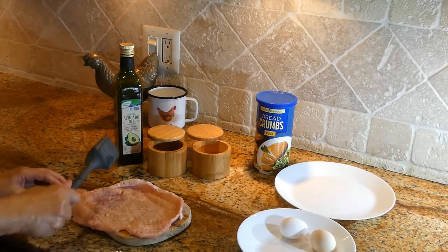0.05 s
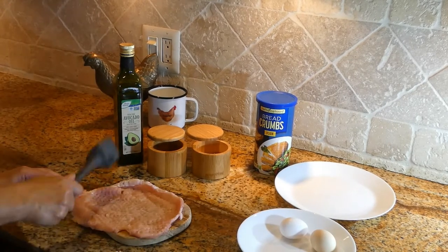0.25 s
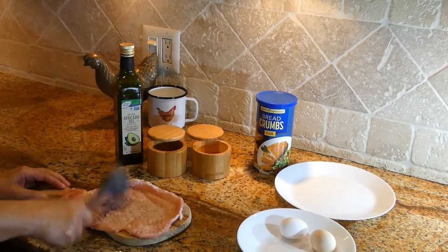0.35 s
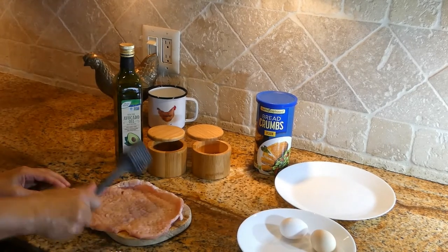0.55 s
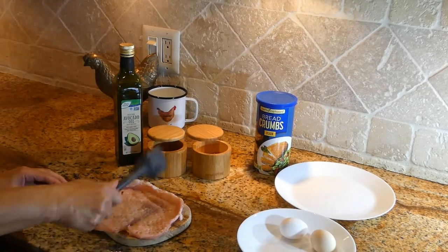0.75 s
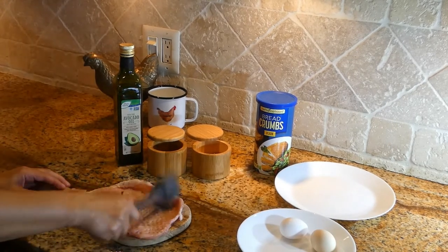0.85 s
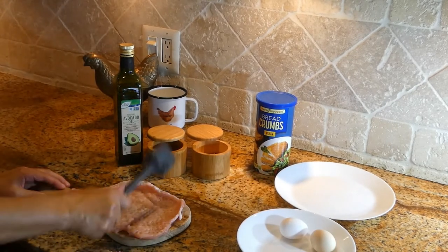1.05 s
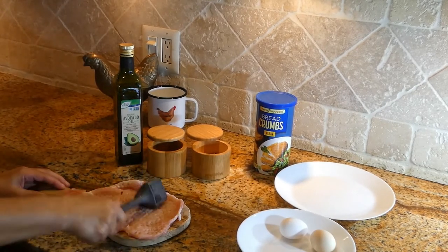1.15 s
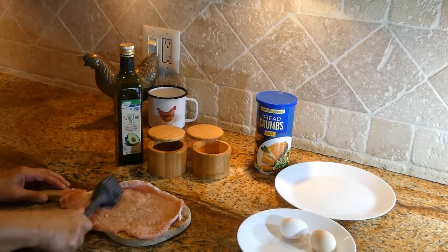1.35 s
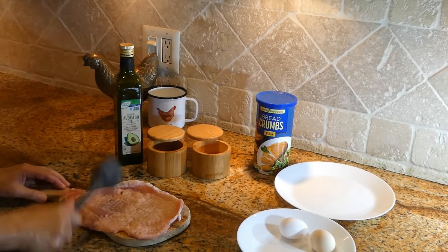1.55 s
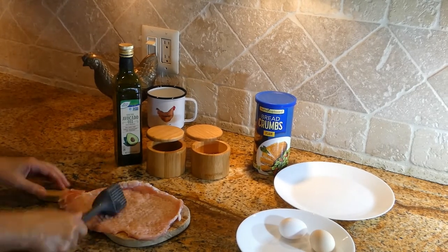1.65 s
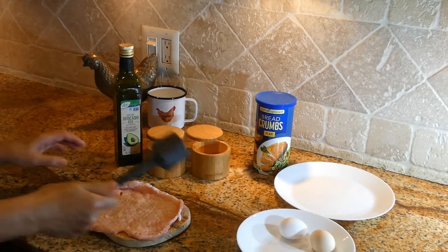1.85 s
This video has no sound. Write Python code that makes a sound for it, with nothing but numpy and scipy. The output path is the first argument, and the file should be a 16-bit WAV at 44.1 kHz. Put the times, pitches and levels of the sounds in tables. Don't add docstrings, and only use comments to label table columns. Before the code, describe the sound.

A mallet pounds raw meat on a wooden board. Silence until 0.2 seconds, then an earlier blow's echo enters abruptly. Six loud wet slaps follow near 0.38, 0.63, 0.88, 1.11, 1.35 and 1.6, each a snappy smack with board knock and varying thud, deepest at 0.88, thinnest at 1.35. Hard tiles, cupboards and counter ring between blows over faint hum; everything fades from 1.7 to 2.0.

```python
import sys
import numpy as np
from scipy import signal
from scipy.fft import rfft, irfft, next_fast_len
from scipy.io import wavfile
from scipy.ndimage import map_coordinates

SR = 44100
rng = np.random.default_rng(int(sys.argv[2]) if len(sys.argv) > 2 else 0)


def generate_wav(signal):
    frames = np.transpose(np.atleast_2d(signal))
    scaled = np.clip(frames, -1, 1) * 32767
    pcm = np.round(scaled).astype(np.int16)
    wavfile.write(sys.argv[1], SR, pcm)


def magnitude_from_level(level_db):
    exponent = np.asarray(level_db, float) / 20
    return 10 ** exponent


N = 83790
ECHO_N = SR
SLAP_N = SR // 4

# start in seconds, level in dB, thud in dB, early walls in dB, room in dB.
BLOWS = [
    (.135, -11.5, 0.5, 8, 0.),
    (0.3789, -12.5, -2, -1, -1.5),
    (0.6251, -13.5, 1.5, 2, -0.26),
    (0.8775, -14, 4, -1, 0.5),
    (1.1110, -12, 3.4, 3, 0.5),
    (1.3491, -13.5, -11, 0, -1),
    (1.5965, -12.5, 0.3, 3, 3.5),
]
# knock, board, slap, head and spray, all in dB.
LANDINGS = [(-6.5, 3, -1.5, -5.5, -30), (-2, 4, 0.5, 0.5, 5), (5, 5, -3, -6.5, -3), (6, 1, -2, 0.5, -1),
            (-2, -0.5, -3.5, -8.5, -4), (-1.5, 4.5, 1, 2.5, 1.5), (-8, 2.5, -5, -4.5, -5.5)]
# start pitch in Hz, sag in seconds, end pitch in Hz,
# cupboard ring in dB, counter boom in dB.
SQUEAKS = [(8050, .0013, 700, 9.5, 0), (6470, 0.00214, 450, 12, -1), (9160, 0.001033, 1150, -7.5, 0.5),
           (6670, 0.00161, 405, -19, 1), (6960, 0.000789, 1274, 4, 1.5), (6895, 0.001113, 830, 11, -1.5),
           (7900, .0009, 566, 6.5, 1)]
# knock in Hz, board in Hz, slap in Hz, knock force in dB, air in the echo in dB.
SPOTS = [(605, 1400, 2600, -23, 1), (695, 1455, 2300, -2, -4), (417, 1490, 2350, 5.5, 10.5),
         (925, 1360, 2450, 1, -2), (454, 1290, 1840, 4, 8.5), (730, 1279, 2290, 4, -4),
         (501.2, 1290, 1880, 1, 5.5)]
# width in Hz, level in dB.
SPOT_PEAKS = [(250, -3), (280, -2), (300, 0.5)]
# frequency in Hz, width in Hz, level in dB.
PARTS = [
    [(116, 64, -13), (155.4, 22.5, -5), (349.7, 41.6, -2.5)],
    [(496.24, 280, -6), (1000, 790, -10.5)],
    [(1060, 400, -9)],
    [(2680, 310, 0)],
    [(4113, 196, 1), (4560, 1580, -4)],
    [(6630, 2100, -4), (10040, 1630, -11), (13900, 1300, -20.5)],
]
# frequency in Hz, width in Hz, level in dB.
CUPBOARD = [(1286, 38, -3), (4140, 110, -31)]
# frequency in Hz, width in Hz, level in dB.
COUNTER = [(228, 18, 3), (160, 19, 4.5), (500, 25, -2)]
# delay in seconds, level in dB, lean in dB (added left, taken off right), favoured pitch
# in Hz.
WALLS = [(.0034, -13, 8, 1480), (.0076, -4.5, 0, 1230), (0.01, -18, 9.5, 1380), (0.0179, -20.5, -5, 1500),
         (.025, -12, 0.5, 2497)]
# frequency in Hz, 60 dB decay time in seconds.
CLUTTER_DECAY = [(150, 0.39), (1500, 0.04), (10000, 0.12)]
# frequency in Hz, 60 dB decay time in seconds.
ROOM_DECAY = [(60, 0.98), (150, 1), (400, 1), (1500, 0.73), (4000, 0.81), (8000, 0.59), (14000, 0.36)]
# frequency in Hz, level in dB.
ECHO_TONE = [(60, -5), (200, 0.), (700, 3), (1300, 3), (2000, 5.5), (5000, -3.5), (9000, -13.5),
             (15000, -19.5)]
# frequency in Hz, left-right likeness from 0 to 1.
LIKENESS = [(60, 0.75), (200, 0.97), (700, .78), (2500, 0.76), (5000, .85), (12000, 0.36)]
# frequency in Hz, left-right difference in dB.
BALANCE = [(60, -0.2), (300, -0.5), (1000, -0.4), (3000, 0.3), (12000, .4)]
# frequency in Hz, level in dB.
AIR_TONE = [(25, -1), (60, -3), (100, 4), (160, -29), (500, -17), (2000, -13), (8000, -40)]

RISE_S, CONTACT_S = 0.0005, 0.003
SPRAY_S, SPRAY_HZ, SPRAY_DB = 0.0028, 2200, -1.5
PUSH_S, PUSH_DB = 0.0027, -4
KNOCK_S, KNOCK_AT_S, KNOCK_DB = 0.00014, 0.001989, -1
WALL_WIDTH_HZ, WALL_SCATTER_DB = 450, 1
WALL_DULL_HZ, WALL_FLAT_DB = 6000, -8
CLUTTER_DB, ROOM_DB, BUILD_S = 10, 14, 0.004
RIPPLE_DB, RIPPLE_HZ = 2.5, 89.45
ECHO_AIR_HZ = 9100
RING_NEAR_DB = -10
BLOW_DB, AIR_DB = 13, -49
LOW_CUT_HZ, TOP_HZ = 127, 16300
CEILING, KNEE = 1.02, 5
START_S, FADE_FROM_S, FADE_GONE_S = 0.1957, 1.72, 2.014


def along(points, hz):
    f, value = np.transpose(points)
    return np.interp(np.log(hz + 1), np.log(f + 1), value)


def filtered(x, response):
    n = x.shape[-1]
    m = next_fast_len(n + 8192)
    return irfft(rfft(x, m) * response(np.fft.rfftfreq(m, 1 / SR)), m)[..., :n]


def diffuse_pair(n):
    def mid_side(hz):
        angle = np.arccos(np.clip(along(LIKENESS, hz), -1, 1)) / 2
        return np.array([np.cos(angle), np.sin(angle)])
    mid, side = filtered(rng.standard_normal((2, n)), mid_side)
    return np.array([mid + side, mid - side])


def kitchen_air():
    air = filtered(diffuse_pair(N), lambda hz: magnitude_from_level(along(AIR_TONE, hz)))
    return magnitude_from_level(AIR_DB) * air / air.std()


def resonance(f, hz, width_hz):
    return 1j * f * width_hz / (hz * hz - f * f + 1j * f * width_hz)


def reverberation(decays):
    hz, t, z = signal.stft(diffuse_pair(ECHO_N), SR, nperseg=256)
    level_db = along(ECHO_TONE, hz)[:, None] - 60 * t / along(decays, hz)[:, None]
    x = signal.istft(z * magnitude_from_level(level_db), SR, nperseg=256)[1][:, :ECHO_N]
    x = x * (1 - np.exp(-(np.arange(ECHO_N) / SR / BUILD_S) ** 2))
    return x / np.linalg.norm(x[0])


def room(modes, air_db):
    answer = magnitude_from_level(CLUTTER_DB) * reverberation(CLUTTER_DECAY) + magnitude_from_level(ROOM_DB) * reverberation(ROOM_DECAY)
    knots = rng.standard_normal(1000)

    def colour(f):
        uneven = map_coordinates(knots, [f / RIPPLE_HZ], mode="mirror")
        ripple_db = RIPPLE_DB * np.clip(f / 1200, 0, 1) * uneven
        treble_db = air_db / (1 + (ECHO_AIR_HZ / (f + 1)) ** 4)
        power = sum(np.abs(magnitude_from_level(db) * resonance(f, hz, width)) ** 2 for hz, width, db in modes)
        return magnitude_from_level(ripple_db + treble_db) * np.sqrt(power)
    return filtered(answer, colour)


def walls(x, walls_db):
    def paths(f):
        total = np.ones((2, 1), complex)
        for delay_s, db, lean_db, hz in WALLS:
            scatter_db = WALL_SCATTER_DB * rng.standard_normal()
            gain = magnitude_from_level(db + walls_db + scatter_db + lean_db * np.array([[1], [-1]]))
            rest = magnitude_from_level(WALL_FLAT_DB) / (1 + 1j * f / WALL_DULL_HZ)
            tone = resonance(f, hz, WALL_WIDTH_HZ) + rest
            total = total + gain * tone * np.exp(-2j * np.pi * f * delay_s)
        return total
    return filtered(x, paths)


def push(t, peak_s):
    u = np.maximum(t, 0) / peak_s
    return u * np.exp(1 - u)


def squeezed_air(t, start_hz, sag_s, end_hz):
    turns = end_hz * t + (start_hz - end_hz) * sag_s * (1 - np.exp(-t / sag_s))
    return np.exp(-(t / CONTACT_S) ** 4) * np.sin(2 * np.pi * (turns + rng.random()))


def wet_spray(t):
    noise = rng.standard_normal(len(t))
    noise = filtered(noise, lambda f: 1 / (1 + (SPRAY_HZ / (f + 1)) ** 4))
    return magnitude_from_level(SPRAY_DB) * np.exp(-(t / SPRAY_S) ** 3) * noise


def slap(modes, start_hz, sag_s, end_hz, knock_db):
    t = np.arange(SLAP_N) / SR
    rise = 1 - np.exp(-(t / RISE_S) ** 2)
    force = rise * (squeezed_air(t, start_hz, sag_s, end_hz) + wet_spray(t))
    force += magnitude_from_level(PUSH_DB) * push(t, PUSH_S)
    force += magnitude_from_level(KNOCK_DB + knock_db) * push(t - KNOCK_AT_S, KNOCK_S)

    def body(f):
        return sum((-1) ** k * magnitude_from_level(db) * resonance(f, hz, width) for k, (hz, width, db) in enumerate(modes))
    return filtered(force, body)


def louder(modes, db):
    return [(hz, width, level + db) for hz, width, level in modes]


def scene():
    out = np.zeros((2, N + ECHO_N))
    for blow, landing, squeak, struck in zip(BLOWS, LANDINGS, SQUEAKS, SPOTS):
        start_s, db, thud_db, walls_db, room_db = blow
        *air, ring_db, boom_db = squeak
        *spot, knock_db, air_db = struck
        modes = []
        for part, share_db in zip(PARTS, (thud_db, *landing)):
            modes += louder(part, share_db)
        for hz, (width, level), share_db in zip(spot, SPOT_PEAKS, landing):
            modes.append((hz, width, level + share_db))
        rings = louder(CUPBOARD, ring_db) + louder(COUNTER, boom_db)
        near = sorted(modes + louder(rings, RING_NEAR_DB))
        i = round(start_s * SR)
        out[:, i:i + SLAP_N] += magnitude_from_level(db + BLOW_DB) * walls(slap(near, *air, knock_db), walls_db)
        out[:, i:i + ECHO_N] += magnitude_from_level(db + BLOW_DB + room_db) * room(modes + rings, air_db)
    return out[:, :N] + kitchen_air()


def top_cut(x):
    return signal.sosfilt(signal.butter(12, 16820, fs=SR, output="sos"), x)


def record(dry):
    def microphones(hz):
        low_cut = (1j * hz / (LOW_CUT_HZ + 1j * hz)) ** 2
        balance = magnitude_from_level(along(BALANCE, hz) / 2 * np.array([[1], [-1]]))
        return low_cut * balance / np.sqrt(1 + (hz / TOP_HZ) ** 40)
    x = filtered(dry, microphones)
    x = x / (1 + np.abs(x / CEILING) ** KNEE) ** (1 / KNEE)
    t = np.arange(N) / SR
    fade = np.clip((FADE_GONE_S - t) / (FADE_GONE_S - FADE_FROM_S), 0, 1)
    return top_cut(x * (t > START_S) * fade)


dry = scene()
out = record(dry)
generate_wav(out)
```